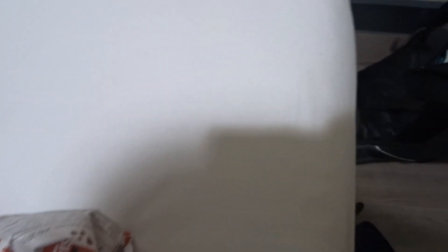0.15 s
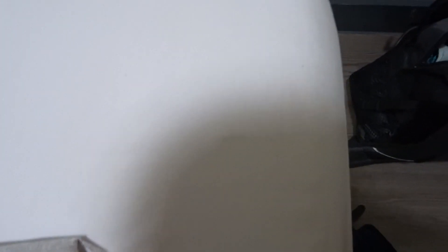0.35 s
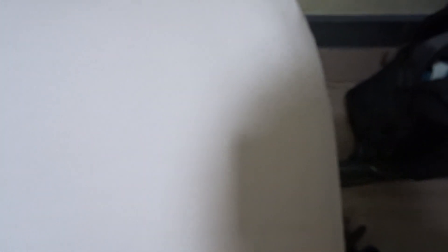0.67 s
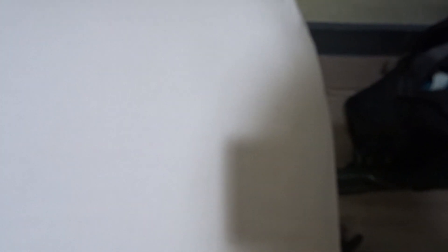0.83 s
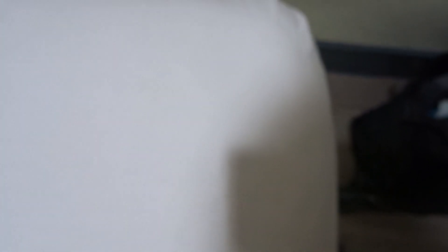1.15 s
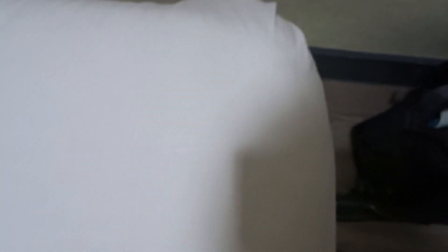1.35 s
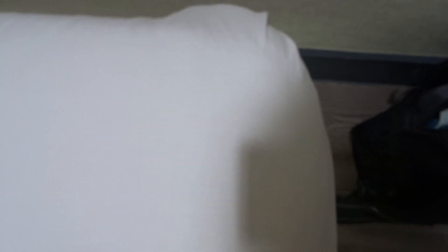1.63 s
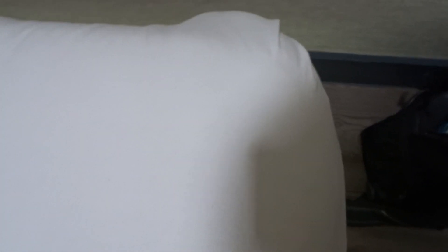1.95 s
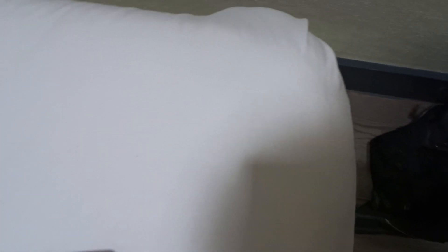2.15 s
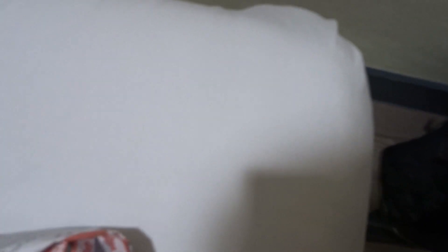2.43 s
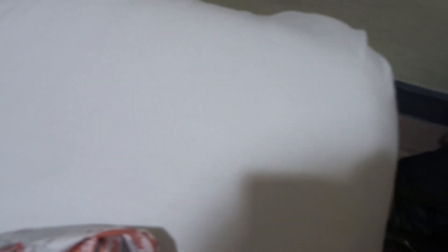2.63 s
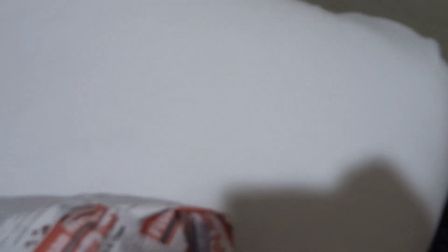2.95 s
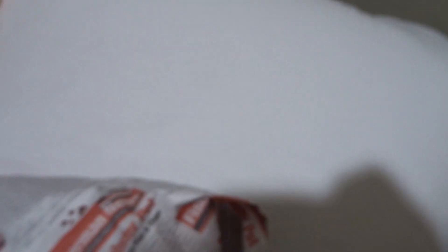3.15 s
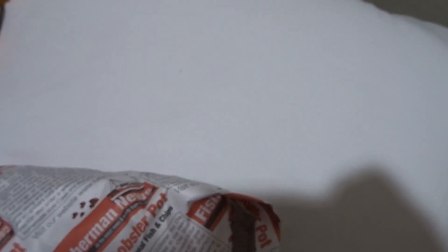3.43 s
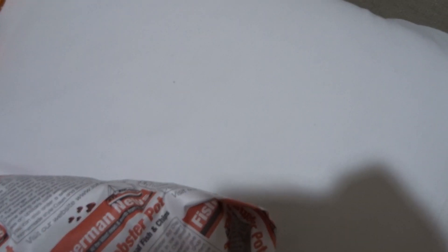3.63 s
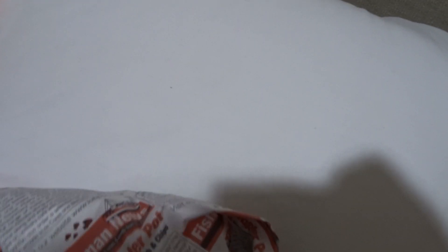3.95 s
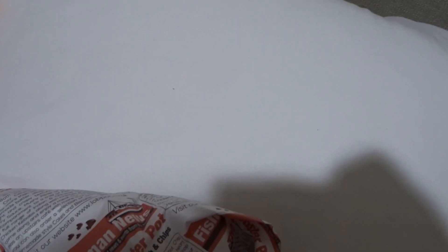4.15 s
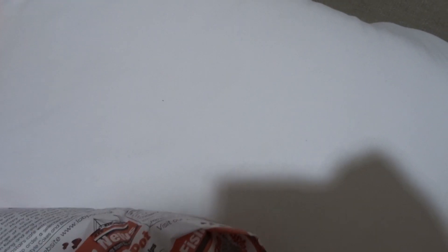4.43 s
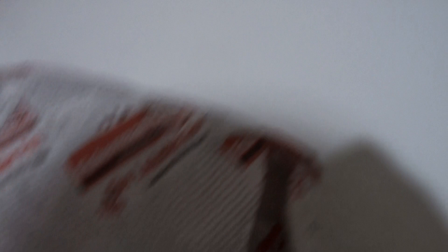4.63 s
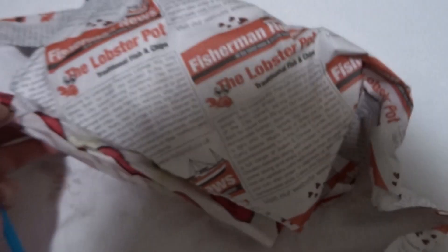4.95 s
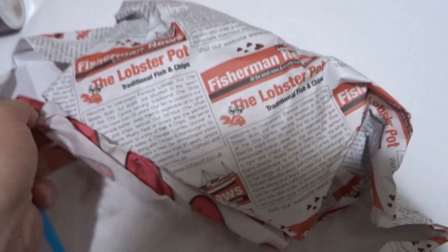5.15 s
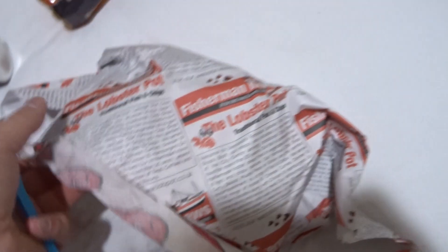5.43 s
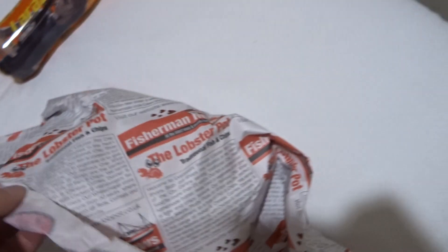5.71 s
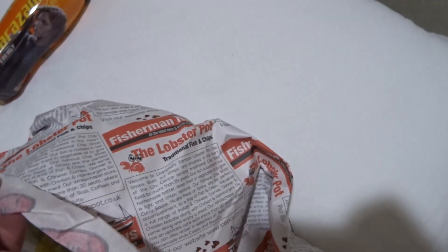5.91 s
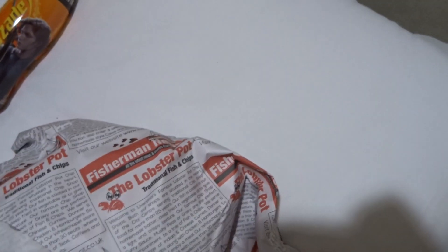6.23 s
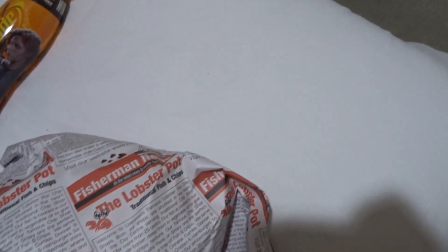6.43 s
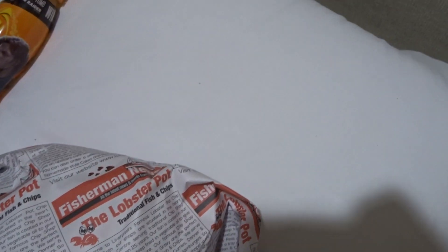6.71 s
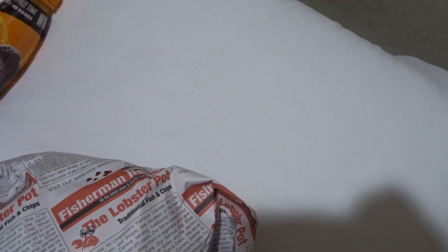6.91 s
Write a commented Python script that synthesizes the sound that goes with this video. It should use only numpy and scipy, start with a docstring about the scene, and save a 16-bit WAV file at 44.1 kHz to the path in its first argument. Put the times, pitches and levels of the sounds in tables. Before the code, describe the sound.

Close in a small, softly furnished room, hands handle a paper-wrapped parcel on a bed. Light rustling quickly grows into loud, crunchy crinkles with sharp crease snaps and a few dull thuds. It eases just after three seconds, resumes drier and brighter, surges near five, almost stops after six, then ends in crisp, fizzy crackles. The microphone is near, with narrow stereo and very little echo.

```python
"""Unwrapping a paper parcel

Hands unwrap a paper parcel of food on a bed, close by in a small, soft room.
With each stroke the sheet crinkles in ringing micro-buckles, hisses as it slides over itself (noise) and flaps.
Stiff creases snap through as pulses filtered by a facet resonance; the parcel thuds in short bands of noise.
The hands rest twice, briefly, leaving a faint room hush of coloured noise.
"""
import sys
import numpy as np
from scipy import signal
from scipy.fft import rfft, irfft, next_fast_len
from scipy.io import wavfile
from scipy.ndimage import map_coordinates

SR = 44100
rng = np.random.default_rng(int(sys.argv[2]) if len(sys.argv) > 2 else 0)


def inscribe(sig):
    """Save sig as 16-bit PCM at rate SR to the path in sys.argv[1].

    A 1-D sig is mono; a 2-D sig holds one channel per row.
    Samples are clipped to [-1, 1] before scaling.
    """
    pcm = np.round(np.clip(np.atleast_2d(sig).T, -1, 1) * 32767)
    wavfile.write(sys.argv[1], SR, pcm.astype(np.int16))


N = 311787

# Stiff creases that snap through. Each row: start in seconds, level in dB before a common offset,
# pitch of the facet in Hz, treble crack in dB above the facet's ring.
CREASE_SNAPS = [(0.204, -23.5, 2860, -1), (0.364, -25, 1750, -12), (0.644, -37.5, 1970, 17),
                (0.671, -18.5, 1220, -9), (0.691, -24, 2860, 2), (0.883, -30, 1300, -10),
                (1.035, -22, 1780, -24), (1.174, -13, 2160, -10), (1.192, -12.5, 1680, -22),
                (1.305, -13.5, 1460, -24), (1.407, -17, 1180, -13), (1.444, -18, 1280, -1),
                (1.484, -15, 2720, -6), (1.716, -23, 1690, -5), (1.792, -19, 1600, -5),
                (1.85, -21.5, 2900, 0), (1.897, -24.5, 1800, 8), (1.948, -18.5, 1070, -5),
                (2.011, -28.5, 3930, 4.5), (2.234, -17.5, 2200, -12), (2.327, -21.5, 1760, -30),
                (2.364, -18.5, 2600, -2.5), (2.491, -22, 3030, -6.5), (2.649, -15.5, 2250, -18),
                (2.672, -15.5, 2120, -20), (2.816, -16.5, 2770, -7), (3.041, -15, 1660, -9),
                (3.204, -25, 1520, -32), (3.318, -30.5, 1174, -1), (3.343, -25, 1180, -11),
                (3.42, -28.5, 2280, 1), (3.483, -20.5, 1290, -18), (3.525, -23, 2740, 3),
                (3.625, -27.5, 2720, 1), (3.741, -21.5, 1750, -6), (3.846, -16.5, 3130, -8),
                (3.911, -22, 2540, 1.5), (4.037, -18.5, 3200, -2.5), (4.073, -19.5, 2420, -6),
                (4.174, -26, 2000, -19), (4.184, -23, 2800, -16), (4.334, -23.5, 1750, -4),
                (4.367, -21, 2450, -10), (4.377, -20, 3420, -2), (4.56, -27, 1650, 7.5),
                (4.754, -32, 3140, 4), (4.789, -40, 2440, -2.5), (4.852, -22.5, 2200, -6),
                (4.879, -14, 2660, -14), (4.901, -18, 2640, -9), (5.005, -17.5, 2610, -16),
                (5.054, -31, 2560, 1.5), (5.109, -16, 1940, -16), (5.164, -17.5, 2800, -9),
                (5.193, -31, 2600, 10), (5.214, -25.5, 2120, 9), (5.285, -20, 2900, -0.5),
                (5.305, -29.5, 2720, 9), (5.356, -24, 1250, -7), (5.415, -23.5, 2040, 1.5),
                (5.471, -19, 1630, -2), (5.624, -20.5, 2970, -3), (5.692, -21, 3100, 4.5),
                (5.751, -18, 2240, 0), (5.784, -20, 2820, -17), (5.896, -17.5, 3040, -1),
                (6.061, -29, 3190, 10.5), (6.099, -27, 2860, 4), (6.121, -17, 1650, -8),
                (6.327, -45, 1860, -16), (6.467, -48, 2600, 2), (6.498, -31.5, 1890, -7),
                (6.603, -30, 1750, -9), (6.644, -27, 2480, 9), (6.677, -23.5, 1850, 0),
                (6.741, -23, 1970, -5), (6.772, -29, 2180, 10), (6.799, -23.5, 2140, -2),
                (6.827, -32.5, 4100, 15), (6.84, -32, 2990, 14), (6.911, -33, 3044, 10),
                (6.932, -19.5, 2960, 3), (6.974, -17, 2455, -9), (7.038, -22, 2550, -3)]
# The open pouch of paper. Each row: time in seconds, cavity resonance in Hz, its strength in dB,
# upper sheen of the folds in dB, share of smooth sliding from 0 to 1 before each register bends it.
POUCH_STATES = [(0, 1150, 3, -1.5, 0.81), (.35, 1105, 1, -3.5, 0.54), (.8, 1160, 4.5, 0, 0.64),
                (1.1, 623, 2.5, 0.5, 0.42), (1.45, 720, 8.5, 3.5, 0.6), (1.95, 667, 5.5, 1.5, 0.55),
                (2.45, 636, 10, -3.5, 0.4), (2.7, 555, 7, -0.5, 0.62), (3.1, 700, 0, -3, 0.3),
                (3.35, 850, 10, -5, 0.93), (3.9, 1480, 1.5, -4.5, 0.52), (4.45, 1450, 7, -1.5, 0.43),
                (4.8, 2900, 5, -4.5, 0.4), (5.1, 1310, 5, 5, 0.33), (5.7, 1240, 6.5, 0, 0.27),
                (5.97, 910, 5, -0.5, 0.78), (6.2, 1600, -3, -3, 0.74), (6.75, 1080, 2, -4.5, 0.2)]


def amp(db):
    """Decibel law: level in dB to amplitude gain."""
    return 10 ** (np.asarray(db) / 20)


def unit(x):
    """Normalisation to unit power: scale to rms 1."""
    return x / np.sqrt(np.mean(x ** 2) + 1e-20)


def along(points, hz):
    """Logarithmic interpolation: read (Hz, value) points on a log frequency axis."""
    f, v = np.transpose(points)
    return np.interp(np.log(hz + 1), np.log(f), v)


def wobble(rate):
    """Band-limited random modulation: a smooth curve with rate knots a second."""
    knots = rng.standard_normal(4096)
    return map_coordinates(knots, [np.arange(N) * rate / SR], mode="wrap")


def ripple(hz, depth_db, width_hz):
    """Random modal density: narrow peaks and dips along frequency, in dB."""
    knots = rng.standard_normal(1024)
    return depth_db * map_coordinates(knots, [hz / width_hz], mode="wrap")


def band(hz, lo_hz, hi_hz, order=5):
    """Butterworth magnitude: gain of a band with soft shoulders."""
    return ((1 + (lo_hz / (hz + 1)) ** (2 * order)) * (1 + (hz / hi_hz) ** (2 * order))) ** -.5


def bump(hz, centre_hz, width_hz):
    """Lorentzian resonance: a peak of height 1."""
    return 1 / (1 + (2 * (hz - centre_hz) / width_hz) ** 2)


def coloured(x, gain):
    """Minimum-phase filtering: a causal filter with the given gain of frequency keeps attacks sharp."""
    n = x.shape[-1]
    m = 2 * next_fast_len(n // 2 + 2048)
    log_gain = np.log(np.maximum(gain(np.fft.rfftfreq(m, 1 / SR)), 1e-6))
    # folding the cepstrum onto positive times gives the minimum phase
    cepstrum = irfft(log_gain)
    cepstrum[1:m // 2] *= 2
    cepstrum[m // 2 + 1:] = 0
    return irfft(rfft(x, m) * np.exp(rfft(cepstrum)), m)[..., :n]


def shifting(x, response, span):
    """Time-varying convolution: the impulse response is renewed, with a cross-fade, every span seconds."""
    hop = int(span * SR)
    padded, out = np.pad(x, (hop, 2 * hop)), np.zeros(N + 4 * SR)
    window = np.hanning(2 * hop)
    for i in range(0, N + hop, hop):
        piece = signal.fftconvolve(padded[i:i + 2 * hop] * window, response(i / SR))
        out[i:i + len(piece)] += piece
    return out[hop:hop + N]


def handling():
    """Power summation of strokes: amplitudes over time of the flap, slack folds, taut folds and fizz."""
    # Pushes and pulls of the hands. Each row: start in seconds, length in seconds, build-up in seconds,
    # crinkle in dB, tautness from 0 to 1, fizz in dB above the crinkle, flap in dB above the crinkle;
    # all levels stand before the gain of each register.
    strokes = [(0.0, 0.055, 0.002, -34.0, 0.6, -4.5, -12), (0.077, 0.13, 0.032, -34.5, 0.5, -1, -13),
               (0.186, 0.078, 0.018, -33.0, 0.46, 0.0, -17), (0.316, 0.17, 0.029, -30.5, 0.48, -5.0, -18),
               (0.511, 0.12, 0.028, -33.5, 0.24, -11.0, -17), (0.64, 0.048, 0.004, -28.5, 0.27, -0.5, -18),
               (0.695, 0.171, 0.035, -25.0, 0.21, -7, -20.5), (0.88, 0.058, 0.03, -23.5, 0.42, -10, -21.0),
               (1.01, 0.029, 0.029, -25.5, 0.53, -7, -16), (1.105, 0.097, 0.057, -19.5, 0.48, -6.5, -22.0),
               (1.261, 0.119, 0.042, -23.0, 0.3, -8, -22), (1.351, 0.207, 0.055, -19.5, 0.54, -3.5, -21),
               (1.677, 0.269, 0.101, -23.0, 0.41, -8, -18.5), (1.977, 0.071, 0.028, -29, 0.5, -3.5, -15),
               (2.067, 0.141, 0.078, -25.5, 0.42, -4, -19), (2.318, 0.052, 0.0064, -28.0, 0.5, -7.5, -32),
               (2.377, 0.04, 0.031, -22.0, 0.31, -5.5, -17.5), (2.465, 0.101, 0.024, -30.5, 0.8, -3, -18),
               (2.571, 0.074, 0.025, -22.0, 0.37, -2.5, -16), (2.628, 0.079, 0.047, -17.0, 0.46, -5.5, -26),
               (2.716, 0.111, 0.017, -20.5, 0.32, -3.5, -29), (2.799, 0.059, 0.02, -16.5, 0.35, -6.5, -17),
               (2.962, 0.097, 0.021, -31.5, 0.51, -0.5, -14), (3.015, 0.032, 0.022, -24.5, 0.46, 0, -21),
               (3.235, 0.019, 0.019, -46.0, 0.6, -9.0, -7.0), (3.314, 0.035, 0.014, -26, 0.34, -5.0, -14.0),
               (3.375, 0.178, 0.039, -29.0, 0.56, -1, -19.5), (3.594, 0.217, 0.035, -30.0, 0.68, -2.5, -21),
               (3.77, 0.156, 0.072, -24.5, 0.8, -0.5, -27), (3.956, 0.147, 0.033, -28.5, 0.67, -2, -22.5),
               (4.133, 0.04, 0.04, -29.0, 0.73, -4.5, -14), (4.249, 0.08, 0.054, -31.0, 0.56, -4.5, -11),
               (4.316, 0.166, 0.054, -25.0, 0.7, -2.5, -17), (4.506, 0.15, 0.042, -28.5, 0.64, -4, -18),
               (4.664, 0.131, 0.025, -26, 0.72, -3.5, -25), (4.826, 0.045, 0.042, -19.5, 0.75, -4.0, -26),
               (4.947, 0.169, 0.119, -21.0, 0.73, -2.5, -21.0),
               (5.17, 0.061, 0.044, -22.5, 0.43, -3.5, -14.5),
               (5.255, 0.228, 0.02, -28.0, 0.49, -5.5, -19.5),
               (5.429, 0.216, 0.026, -26.0, 0.8, -3.0, -18.0), (5.659, 0.127, 0.031, -22.5, 0.79, -3, -20),
               (5.805, 0.112, 0.054, -27.0, 0.5, -4.0, -17.5),
               (5.932, 0.024, 0.019, -23.5, 0.3, -17, -19.5), (5.986, 0.139, 0.038, -27.5, 0.6, -1, -21.0),
               (6.161, 0.055, 0.026, -38, 0.36, -8.0, -9.0), (6.449, 0.184, 0.03, -40.5, 0.14, -3.5, -10.0),
               (6.636, 0.048, 0.007, -25.0, 0.26, -1.0, -26), (6.727, 0.036, 0.012, -25.5, 0.48, 1.5, -18),
               (6.813, 0.07, 0.032, -27.0, 0.4, 7, -19), (6.862, 0.111, 0.044, -24.5, 0.7, 0.5, -25),
               (7.008, 0.036, 0.019, -23.0, 0.63, 2.5, -24.0)]
    # after its length a stroke drops quickly; then the sheet settles, more quietly and slowly
    release_db_per_s, settle_db, settle_db_per_s = 185, -8.5, 60
    t = np.arange(SR) / SR
    power = np.zeros((4, N + 2 * SR))
    for s, length, build_up, level_db, taut, fizz_db, flap_db in strokes:
        since_end = np.maximum(t - length, 0)
        release = amp(-release_db_per_s * since_end)
        settling = amp(settle_db - settle_db_per_s * since_end)
        rise = np.minimum(t / (build_up + 1 / SR), 1)
        envelope = rise * np.maximum(release, settling) * amp(level_db)
        shares = [amp(flap_db) ** 2, 1 - taut, taut, amp(fizz_db) ** 2]
        power[:, round(s * SR):][:, :SR] += np.outer(shares, envelope ** 2)
    return np.sqrt(power[:, :N])


def stick_slip():
    """Stick-slip friction: a lull while a big crease resists, a brief shower of buckles once it gives."""
    lull_db, lull_s, shower_db, shower_s = 3, 0.0096, 0.5, 0.008
    folds_share = 0.59  # the fizz feels it fully, the folds by this share, the flap not at all
    t = np.arange(SR // 10) / SR
    lull = -lull_db * np.exp(-t / lull_s)[::-1]
    shower = shower_db * np.exp(-t / shower_s)
    around = np.concatenate([lull, shower])
    gain_db = np.zeros(N + SR)
    for s, *_ in CREASE_SNAPS:
        gain_db[round(s * SR):][:len(around)] += around
    centred_db = gain_db[len(t):][:N]  # each snap falls between its lull and its shower
    return amp(np.outer([0, folds_share, folds_share, 1], centred_db))


def paper_tone(hz):
    """Resonant radiation: the wrapping with its hollows, through the bright peak of the microphone port."""
    # Tone of the wrapping. Each row: frequency in Hz, relative density in dB per Hz.
    wrapping = [(60, -37), (110, -28), (300, -7.5), (480, -7.5), (620, -3), (850, -0.5), (1250, 1.5),
                (2200, -0.5), (3000, 1.5), (4400, -2.5), (6200, -2), (8100, -7), (12500, -6.5),
                (15800, -8.5)]
    # Hollows of the parcel. Each row: resonance in Hz, width in Hz, height in dB.
    hollows = [(154.8, 10.6, 11.5), (230, 11, 4.5), (330, 20, 5.5), (620, 55, 2.5)]
    hollows_db = sum(db * bump(hz, centre, width) for centre, width, db in hollows)
    port_db = 8.2 * bump(hz, centre_hz=10360, width_hz=2300)
    return amp(along(wrapping, hz) + hollows_db + port_db)


def buckles(rate, spread_db, life, count=7):
    """Modal synthesis: tiny buckles at random moments each ring a few short modes; broad spectrum, rms 1."""
    n = int(rate * N / SR)
    draw = rng.random((n, 2 + 2 * count))
    start = (draw[:, 0] * N).astype(int)
    size = amp(spread_db * draw[:, 1] ** 2)  # many small ones, few large
    hz = 400 * 40 ** draw[:, 2:2 + count]
    tau = life * (hz / 3000) ** -.5  # large, low facets ring longer
    strength = size[:, None] * (2 * draw[:, 2 + count:] - 1) * np.sqrt(hz / tau)
    t = np.arange(SR // 200, dtype=np.float32) / SR
    turns, fade = (2 * np.pi * hz).astype(np.float32), (1 / tau).astype(np.float32)

    def mode(k):
        return strength[:, k, None] * (np.sin(turns[:, k, None] * t) * np.exp(-fade[:, k, None] * t))

    rings = sum(mode(k) for k in range(count))
    places = start[:, None] + np.arange(len(t))
    return unit(np.bincount(places.ravel(), rings.ravel(), N)[:N])


def avalanches(rate, life, depth):
    """Avalanche dynamics: sudden random surges die away, as if folds set off their neighbours; rms 1."""
    chance, size = rng.random(N), rng.uniform(0.92, 1, N)
    triggers = size * (chance < rate / SR)
    surges = signal.lfilter([1], [1, -np.exp(-1 / (life * SR))], triggers)
    return unit(np.sqrt(1 + depth * surges))


def pouch(s):
    """Cavity resonance: response of the crumpled sheet at time s, with fold sheen and ever new facets."""
    times, *columns = np.transpose(POUCH_STATES)
    cavity_hz, cavity_db, sheen_db, _ = [np.interp(s, times, c) for c in columns]

    def gain(hz):
        cavity = cavity_db * bump(hz, cavity_hz, 0.18 * cavity_hz)
        sheen = sheen_db * bump(hz, centre_hz=6730, width_hz=2000)
        return amp(cavity + sheen + ripple(hz, depth_db=2.0, width_hz=170))

    return coloured(signal.unit_impulse(1024), gain)


def crinkle(hands):
    """Buckling and friction: slack folds sound low, taut ones high, and the sheet flaps beneath."""
    flapping, slack_folds, taut_folds, fizzing = hands
    times, *_, shares = np.transpose(POUCH_STATES)
    sliding = np.interp(np.arange(N) / SR, times, shares)
    grains = buckles(rate=1100, spread_db=13.0, life=0.0014)
    grains = unit(grains * avalanches(rate=70, life=0.0089, depth=2.7))
    rub = rng.standard_normal(N)

    def register(lo_hz, hi_hz, graininess, flutter_db):
        smooth = sliding ** graininess  # a larger exponent leaves more buckles and less rubbing
        source = np.sqrt(1 - smooth) * grains + np.sqrt(smooth) * rub
        voice = coloured(source, lambda hz: paper_tone(hz) * band(hz, lo_hz, hi_hz))
        return unit(voice * amp(flutter_db * wobble(rate=45)))

    flap = amp(-4.5) * flapping * register(lo_hz=59.7, hi_hz=463, graininess=0.93, flutter_db=2.0)
    slack = amp(-10) * slack_folds * register(lo_hz=500, hi_hz=1750, graininess=1.65, flutter_db=-0.45)
    stiff = amp(-5.5) * taut_folds * register(lo_hz=1750, hi_hz=5550, graininess=0.71, flutter_db=1.55)
    fizz = amp(-4.5) * fizzing * register(lo_hz=4570, hi_hz=16900, graininess=0.41, flutter_db=1.5)
    return shifting(flap + slack + stiff + fizz, pouch, span=.09)


def snap(level_db, facet_hz, crack_db):
    """Snap-through instability: a pulse, a brief facet ring, a weaker settling click, a shiver of the sheet."""
    t = np.arange(SR // 20) / SR
    settle = rng.uniform(.0016, .003)  # seconds until the settling click

    def burst(life, pulse):
        first = np.exp(-t / life)
        second = .45 * (t > settle) * np.exp(-np.abs(t - settle) / life)
        shiver = .06 * np.exp(-t / .01)
        return (first + second + shiver + pulse * (t == 0)) * rng.choice([-1, 1], len(t))

    def facet(hz):
        peak_db = 10 * bump(hz, facet_hz, 0.46 * facet_hz)
        return band(hz, 290, 4800) * amp(peak_db + ripple(hz, depth_db=2, width_hz=325))

    ring_life = 0.0015 * (2200 / facet_hz) ** 0.36  # large, low facets ring longer
    release = burst(ring_life, pulse=3)
    ring = unit(coloured(release, lambda hz: paper_tone(hz) * facet(hz)))
    sharp = burst(life=0.0011, pulse=1.0)
    crack = unit(coloured(sharp, lambda hz: paper_tone(hz) * band(hz, 4400, 14600)))
    return amp(level_db - 16) * (ring + amp(crack_db) * crack)


def lesser_snaps(hands, count=80):
    """Load-driven random events: small snaps, more and louder the harder the work, as bright as its fizz."""
    top_db, range_db = 3, 5  # highest level over the crinkle, before the offset in snap, and range below it
    typical_hz, spread_octaves = 2200, 0.41
    _, slack_folds, taut_folds, fizzing = hands
    effort = np.hypot(slack_folds, taut_folds) + 1e-9
    chance = np.cumsum(np.sqrt(effort))
    at = np.searchsorted(chance / chance[-1], (np.arange(count) + rng.random(count)) / count)
    level_db = 20 * np.log10(effort[at]) + top_db - range_db * rng.random(count)
    facet_hz = typical_hz * 2 ** (spread_octaves * rng.standard_normal(count))
    crack_db = 20 * np.log10(fizzing[at] / effort[at] + 1e-9) + 2.5
    return list(zip(at / SR, level_db, facet_hz, crack_db))


def creases(hands):
    """Superposition of transients: every snap, large or small, at its moment."""
    out = np.zeros(N + SR)
    for s, level_db, facet_hz, crack_db in list(CREASE_SNAPS) + lesser_snaps(hands):
        click = snap(level_db, facet_hz, crack_db)
        out[round(s * SR):][:len(click)] += click
    return out[:N]


def thuds():
    """Heavily damped impact: soft, dull knocks of the filled parcel as decaying narrow-band noise."""
    # Bumps against hands and bedding. Each row: start in seconds, level in dB before a common offset,
    # pitch in Hz, life in seconds.
    bumps = [(1.141, -23.5, 415, 0.0051), (1.405, -25, 395, 0.0071), (1.525, -42, 154, 0.051),
             (1.944, -24, 430, 0.0064), (2.488, -32, 230, 0.0083), (2.64, -29.5, 645, 0.013),
             (2.696, -26.5, 535, 0.014), (2.836, -36.5, 191, 0.041), (5.273, -38.5, 268, 0.01),
             (5.312, -34, 240, 0.017), (5.349, -35, 174, 0.024), (5.949, -26, 1020, 0.01)]
    out, t = np.zeros(N + SR), np.arange(SR // 6) / SR
    for s, level_db, pitch_hz, life in bumps:
        fade = np.exp(-t / life)
        noise = rng.standard_normal(len(t)) * fade
        knock = coloured(noise, lambda hz: band(hz, .75 * pitch_hz, 1.25 * pitch_hz, order=4))
        # short knocks carry less energy
        out[round(s * SR):][:len(t)] += amp(level_db - 2.0) * unit(knock) * np.sqrt(np.mean(fade ** 2))
    return out[:N]


def room(s):
    """Diffuse reverberation: a furnished bedroom's short decay, drawn anew as the paper moves."""
    # Absorption of the walls. Each row: frequency in Hz, time in seconds to decay by 60 dB.
    walls = [(200, 1), (2000, 0.4), (12000, 0.17)]
    hz, t, z = signal.stft(rng.standard_normal(SR // 3), SR, nperseg=256)
    decay = amp(-60 * t / along(walls, hz)[:, None])
    tail = signal.istft(z * decay, SR, nperseg=256)[1]
    return np.pad(tail / np.linalg.norm(tail), (round(.007 * SR), 0))  # 7 ms before the first reflection


def room_hush():
    """Stationary background noise: Gaussian noise with the spectrum of the still room."""
    # The still room. Each row: frequency in Hz, relative density in dB per Hz.
    still_room = [(25, -22), (65, -27), (110, -9.5), (300, -1.5), (420, 0.5), (1600, -10.5), (3000, -18),
                  (7000, -16), (10500, -28), (15800, -31)]
    return amp(-51) * unit(coloured(rng.standard_normal(N), lambda hz: amp(along(still_room, hz))))


def scatter(s):
    """Multipath scattering: short paths from many facets reach the two microphone ports differently."""
    t = np.arange(SR // 100) / SR
    paths = rng.standard_normal(len(t)) * np.exp(-t / 0.0014)
    return paths / np.linalg.norm(paths)


def scene():
    """Mid-side superposition: close paper with little deep bass, its room and hush at two nearly alike ports."""
    # Stereo width. Each row: frequency in Hz, side level in dB against the middle.
    side_width = [(60, -22), (130, -35), (290, -20), (640, -18.5), (1410, -18.5), (3100, -16.5),
                  (6000, -8.5), (10500, -12), (15000, -22.5)]
    hands = handling()
    parcel = crinkle(hands * stick_slip()) + creases(hands) + thuds()
    paper = coloured(parcel, lambda hz: band(hz, lo_hz=92, hi_hz=30000, order=4))
    mid = paper + amp(-11.5) * shifting(paper, room, span=.25) + room_hush()
    side = coloured(shifting(mid, scatter, span=.05), lambda hz: amp(along(side_width, hz)))
    return np.array([mid + side, mid - side])


def record(dry):
    """Band limitation: an ideal low-pass removes everything from its top frequency upward."""
    top_hz = 15900
    m = next_fast_len(N + SR // 4)
    return irfft(rfft(dry, m) * (np.fft.rfftfreq(m, 1 / SR) < top_hz), m)[..., :N]


dry = scene()
out = record(dry)
inscribe(out)
```